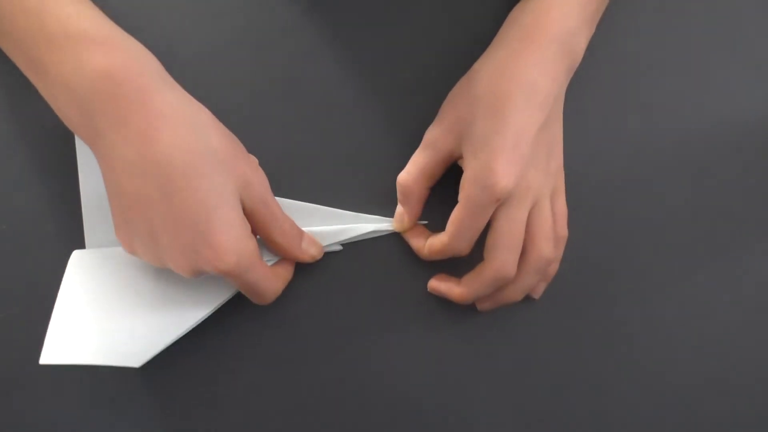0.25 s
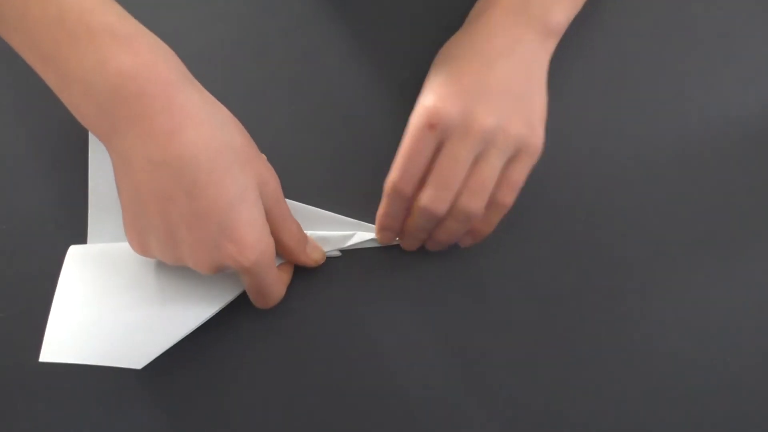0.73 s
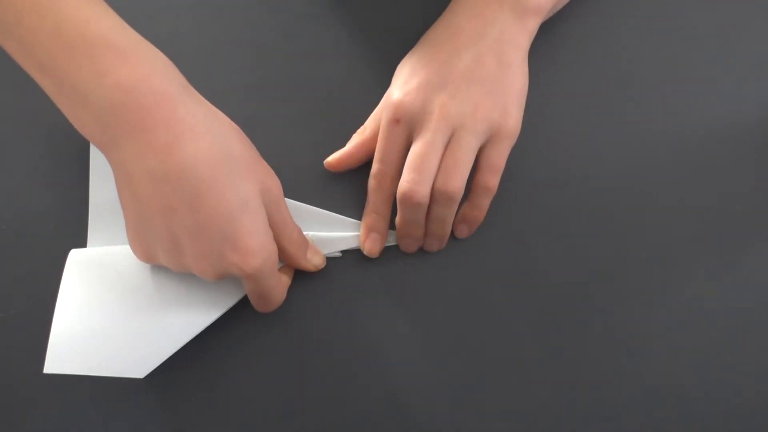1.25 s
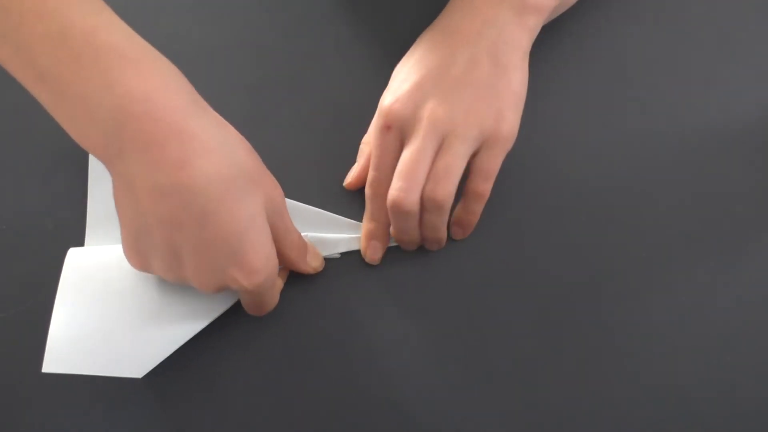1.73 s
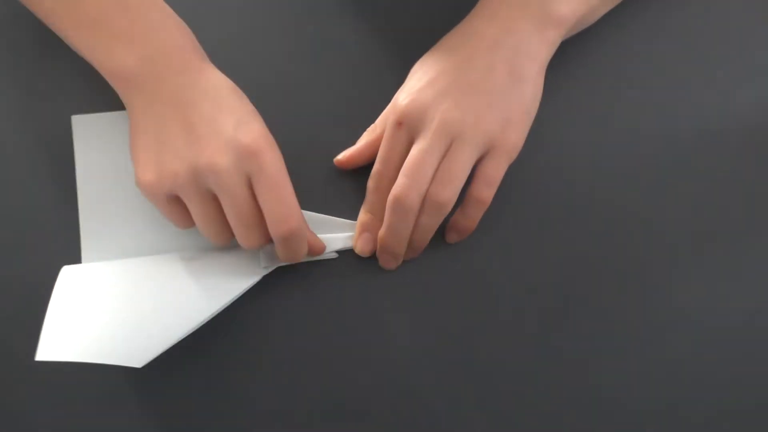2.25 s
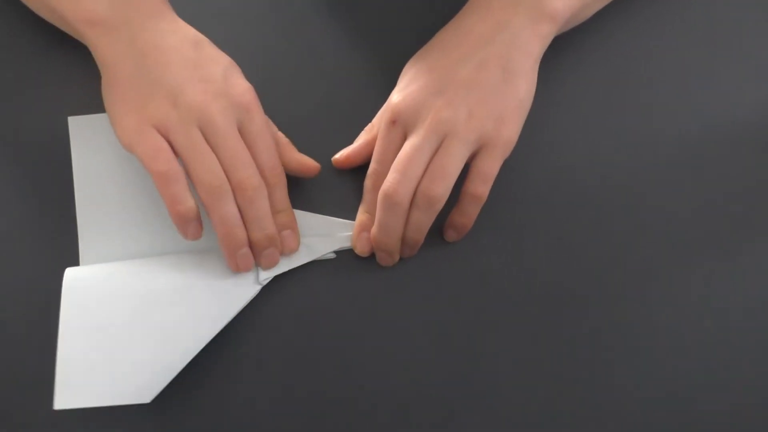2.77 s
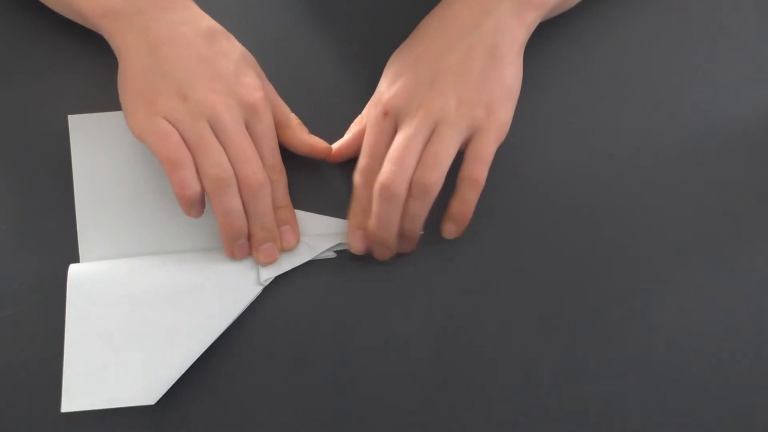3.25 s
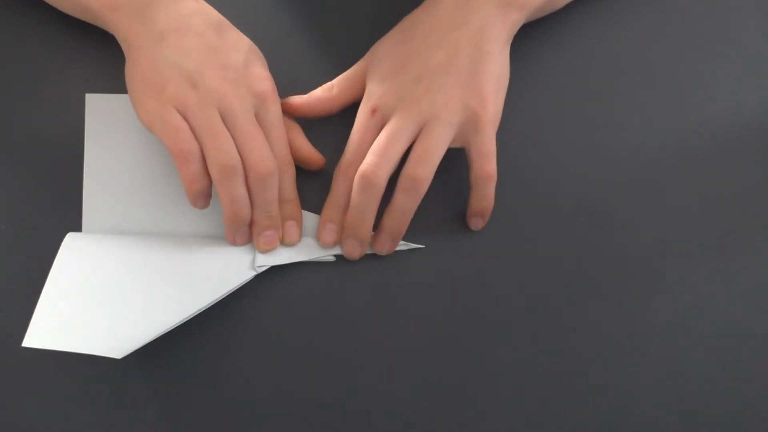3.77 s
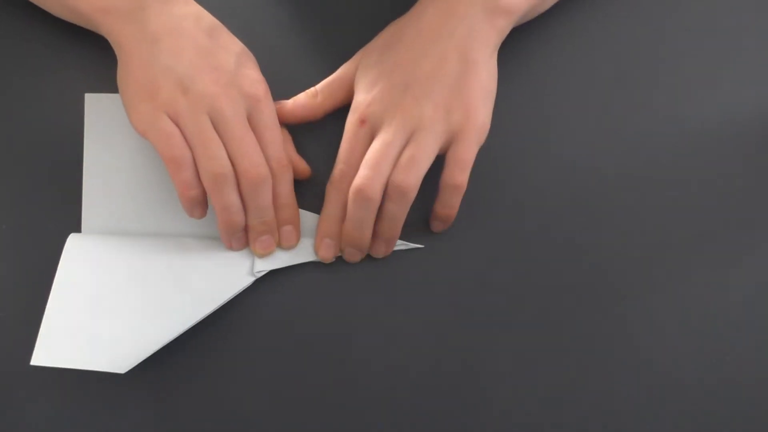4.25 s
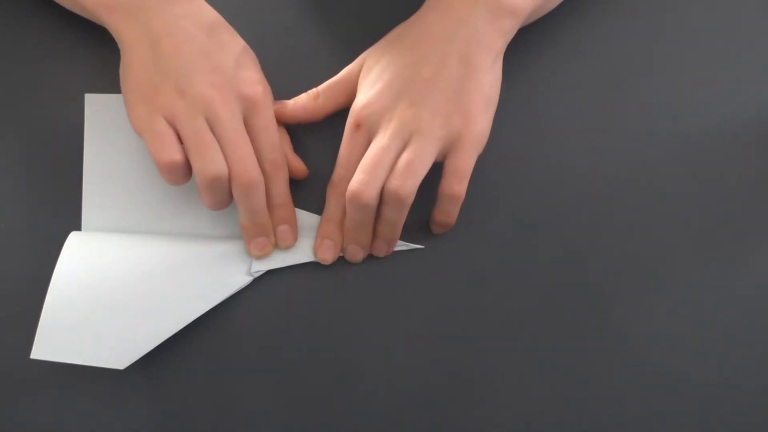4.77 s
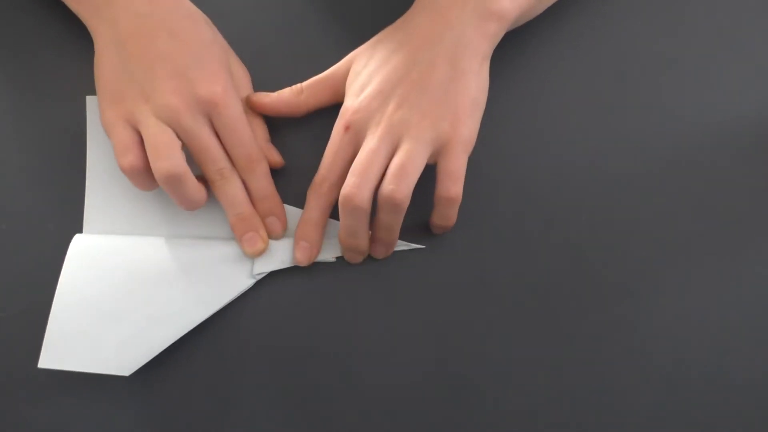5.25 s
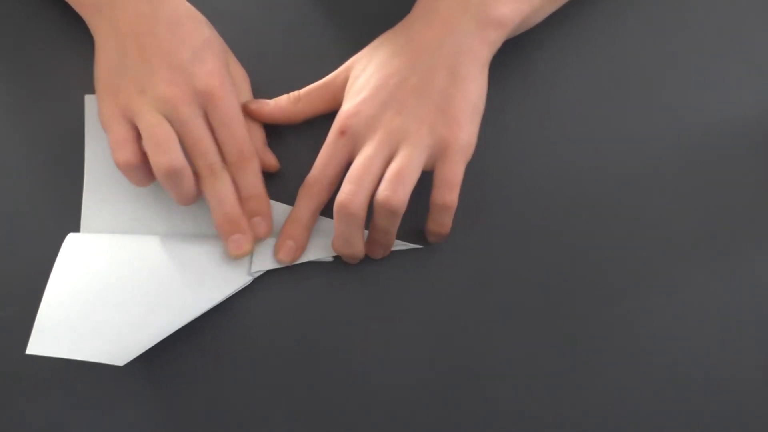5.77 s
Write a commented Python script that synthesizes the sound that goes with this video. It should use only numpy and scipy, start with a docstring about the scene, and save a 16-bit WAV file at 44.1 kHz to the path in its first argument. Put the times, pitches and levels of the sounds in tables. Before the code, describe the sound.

Hands press folds into a stiff sheet of paper on a table. Crisp snaps come at once, then a dense run of crackles before two seconds. It thins to ticks, dull paper slaps and short rustles, then isolated loud pops with a soft table boom, ending on a hard snap. Close stereo microphone, paper slightly left, small quiet room with faint hiss, rumble and a thin whine.

```python
"""Folding paper on a table

Creases snap as bursts of breaks through sheet resonances, single fibres tick, a loose wing slaps in dull notes.
Fingers slide over the sheet as grainy noise, and hands boom the table top through a few low decaying modes.
A quiet room answers with sparse reflections over rumble, hiss and a thin whine, close to a small stereo mic.
A limiter ducks for loud snaps and creeps back up."""
import sys
import numpy as np
from scipy import signal
from scipy.fft import rfft, irfft
from scipy.io import wavfile
from scipy.ndimage import uniform_filter1d

SR = 44100
rng = np.random.default_rng(int(sys.argv[2]) if len(sys.argv) > 2 else 0)


def wav_out(sig):
    """Save sig, one row per channel (or a flat mono array), as 16-bit PCM at SR to the path in sys.argv[1]."""
    wavfile.write(sys.argv[1], SR, np.round(np.clip(np.atleast_2d(sig).T, -1, 1) * 32767).astype(np.int16))


def volts_from_decibels(level):
    """Turn decibel levels (scalar or array-like) into linear amplitude factors."""
    exponent = np.asarray(level, float) / 20
    return 10 ** exponent


N = 265261  # length in samples


def read(points, hz):
    """Value of a (Hz, value) table, straight on a log axis."""
    f, value = np.transpose(points)
    return np.interp(np.log(hz + 1), np.log(f + 1), value)


def evened(x):
    """Scales to rms 1."""
    return x / np.sqrt(np.mean(x ** 2) + 1e-20)


def peaked(x):
    """Scales each row to peak 1."""
    return x / abs(x).max(1, keepdims=True)


def smooth_noise(shape, width):
    """Slow random wander of rms 1: white noise averaged over width samples."""
    return evened(uniform_filter1d(rng.standard_normal(shape), width))


def coloured(x, gain):
    """Multiplies the spectrum of x by gain(Hz)."""
    return irfft(rfft(x) * gain(np.fft.rfftfreq(x.shape[-1], 1 / SR)), x.shape[-1])


def place(times, sounds):
    """Mixes each sound in at its time."""
    mix = np.zeros(N + sounds.shape[1])
    for s, sound in zip(times, sounds):
        mix[round(s * SR):][:len(sound)] += sound
    return mix[:N]


def modes(table, hz, shift):
    """Spectrum of a row of resonances with alternating signs, all moved by the factor shift."""
    total = 0
    for k, (f, width, db) in enumerate(table):
        total = total + (-1) ** k * volts_from_decibels(db) * width / (width + 2j * (hz - f * shift))
    return total


# Colour of the room tone. Each row: frequency in Hz, relative density in dB per Hz.
ROOM_TONE = [(22, -18), (86, -17.5), (123, -2), (146, -11.5), (210, -11), (410, -16), (558, -24.5),
             (2080, -19), (2670, -24), (3530, -28), (9400, -34.5), (14500, -37.5), (16200, -49)]
# How alike left and right are, in room tone and reverb. Each row: frequency in Hz, likeness (1 = identical).
STEREO_LIKENESS = [(30, 0.12), (70, 0.76), (180, 0.38), (550, 0.14), (1650, 0.32), (5000, 0.97), (15000, 1)]


def hush():
    """Room rumble and microphone hiss: shaped stereo noise, wavering a little in patches."""
    level_db, waver_db = -44.5, 2.37  # both rms
    frames, hz = N // 512 + 5, np.fft.rfftfreq(2048, 1 / SR)
    a, b, c, d, patches = rng.standard_normal((frames, 1025, 5)).T
    patches = evened(uniform_filter1d(uniform_filter1d(patches, 20, 0), 10, 1))
    same = np.clip(read(STEREO_LIKENESS, hz), -1, 1)[:, None]
    left = a + 1j * b
    right = same * left + np.sqrt(1 - same ** 2) * (c + 1j * d)
    z = np.array([left, right]) * volts_from_decibels(read(ROOM_TONE, hz)[:, None] + waver_db * patches)
    noise = signal.istft(z, nperseg=2048, noverlap=1536)[1][:, :N]
    return volts_from_decibels(level_db) * evened(noise)


def whine():
    """A faint thin sine that drifts by a few hertz."""
    centre_hz, level_db = 2700, -60  # level is rms
    drift_hz = 2.37 * smooth_noise(N, 9000)
    turns = np.cumsum(centre_hz + drift_hz) / SR
    return volts_from_decibels(level_db) * np.sqrt(2) * np.sin(2 * np.pi * turns)


# How fast the room dies away. Each row: frequency in Hz, time to fall 60 dB in seconds.
ROOM_DECAY = [(150, 0.47), (800, 0.4), (2100, 0.21), (5500, 0.48), (14000, 0.088)]


def room(x):
    """Sparse reflections of random sign, each band dying at its own speed."""
    taps = np.zeros((2, SR // 2))
    # one reflection in every 20 samples, after a short gap
    at = np.arange(200, SR // 2 - 20, 20) + rng.integers(0, 20, (2, (SR // 2 - 201) // 20))
    np.put_along_axis(taps, at, rng.choice([-1., 1.], at.shape), 1)
    hz, t, z = signal.stft(taps, SR, nperseg=256)
    same = np.clip(read(STEREO_LIKENESS, hz), 0, 1)[:, None]  # close ports hear much the same tail
    z[1] = same * z[0] + np.sqrt(1 - same ** 2) * z[1]
    fade = volts_from_decibels(-60 * t / read(ROOM_DECAY, hz)[:, None])
    tail = signal.istft(z * fade, SR, nperseg=256)[1]
    tail = tail / np.linalg.norm(tail, axis=1, keepdims=True)
    return signal.fftconvolve(x[None], tail, axes=1)[:, :N]


# Hands leaning on the table top; the row at 1.661 s is the top booming after a snap. Each row: start in
# seconds, # length of the push in seconds (as it feeds the lowest mode), peak level in dB.
HAND_BUMPS = [(0.595, 0.13, -31.5), (0.868, 0.015, -39.5), (1.0, 0.096, -37), (1.329, 0.065, -36),
              (1.661, 0.025, -36), (2.261, 0.021, -34.5), (2.99, 0.023, -34), (3.898, 0.036, -37),
              (4.293, 0.08, -21.5), (4.39, 0.045, -33.5), (5.291, 0.12, -34), (5.799, 0.064, -33.5)]
# Low modes of the table top. Each row: frequency in Hz, relative level in dB,
# time for the boom to fall 60 dB in seconds.
TABLE_MODES = [(118, 1, 0.14), (134.3, -8, 0.19), (182, -11.5, 0.36), (220, -4, 0.17), (294.6, -7.5, 0.12),
               (444.5, -11, 0.091)]


def bumps(size=16384):
    """Low modes of the table top shudder while a hand settles, then die; knocking creases thump it too."""
    s, length, level_db = np.transpose(HAND_BUMPS)[:, :, None]
    t, boom, thump = np.arange(size) / SR, 0, 0
    lowest_hz = TABLE_MODES[0][0]
    for f, db, t60 in TABLE_MODES:
        shudder = uniform_filter1d(rng.standard_normal((len(s), size)), 500)
        shudder = evened(uniform_filter1d(shudder, 500))
        turns = rng.random((len(s), 1)) + np.cumsum(f * (1 + 0.055 * shudder), axis=1) / SR
        kept = length * lowest_hz / f  # higher modes are fed for a shorter time
        boom_db = db + 2.2 * shudder[:, ::-1] - 60 * np.maximum(t - kept, 0) / t60
        boom = boom + volts_from_decibels(boom_db) * np.sin(2 * np.pi * turns)
        # the thump is steady in pitch, dies sooner and favours the higher modes
        thump = thump + f / lowest_hz * volts_from_decibels(db - 60 * t / (0.83 * t60)) * np.sin(2 * np.pi * f * t)
    snap_s, peak_db, _, _, knock_db = np.transpose(CREASE_SNAPS)[:, :, None]
    snap_thumps = volts_from_decibels(peak_db + knock_db - 24) * thump * np.minimum(t / 0.0033, 1)
    hand = boom * np.minimum(t / 0.0096, 1) + 0.5 * thump * np.minimum(t / 0.0024, 1)
    return place(s[:, 0], volts_from_decibels(level_db) * peaked(hand)) + place(snap_s[:, 0], snap_thumps)


# The loose wing slapping the table top. Each row: start in seconds, peak level in dB, note in Hz.
WING_FLAPS = [(0.7089, -23, 1160), (1.0942, -30, 1010), (1.2063, -30, 1120), (1.3327, -16.5, 940),
              (2.4355, -27, 990), (2.5456, -27, 1390), (2.5632, -24, 1410), (2.993, -17, 1380)]


def flaps(size=2048):
    """A soft, uneven contact of a few milliseconds rings one broad, dull note of the wing."""
    s, peak_db, note_hz = np.transpose(WING_FLAPS)[:, :, None]
    t, hz = np.arange(size) / SR, np.fft.rfftfreq(size, 1 / SR)
    contact = 0.16 * rng.standard_normal((len(s), size)) * volts_from_decibels(-60 * t / 0.029)
    contact[:, 0] += 1
    lowcut = (1j * hz / (note_hz + 1j * hz)) ** 4  # little below the note
    resonance = 1 / (1 + 2j * (hz - note_hz) / 260)
    dulling = 1 / (1 + 1j * hz / 4000)  # a dull tick above it
    ring = irfft(rfft(contact) * lowcut * resonance * dulling, size)
    return place(s[:, 0], volts_from_decibels(peak_db) * peaked(ring))


# Single fibres letting go. Each row: start in seconds, peak level in dB, pitch in Hz.
FIBRE_TICKS = [(.184, -37, 3170), (.9883, -25, 2800), (1.409, -32, 4300), (1.4723, -21.5, 2930),
               (1.536, -23, 4800), (1.563, -19, 4200), (1.844, -29, 5000), (1.918, -26, 2370),
               (2.09, -25, 2870), (2.1683, -18, 2370), (2.612, -24, 2600), (3.0025, -30, 4800),
               (3.127, -35, 3140), (3.302, -29, 3800), (3.379, -35, 2370), (3.4075, -28, 2130),
               (3.442, -36.5, 4500), (3.5292, -23, 2200), (3.5454, -25, 2560), (3.599, -26.5, 2700),
               (3.8687, -37, 3000), (3.8906, -31, 1470), (3.8981, -31, 2900), (3.917, -29, 2500),
               (4.0092, -32.5, 1770), (4.0915, -31.5, 2420), (4.2208, -34.5, 1580), (4.2952, -24, 3020),
               (4.305, -22.5, 2820), (4.376, -32, 2100), (4.4606, -24.5, 2120), (4.96, -25.5, 1310),
               (5.111, -32, 3036), (5.143, -33, 2900), (5.166, -31, 2970), (5.306, -29.5, 2700),
               (5.316, -33, 4400), (5.39, -29, 2610), (5.443, -29.5, 2400), (5.481, -24.5, 2200),
               (5.6677, -23, 2780), (5.7678, -29.5, 4500), (5.7825, -22, 2980), (5.798, -28, 2600)]


def ticks(size=1024):
    """A tiny burst of breaks rings one broad patch of the sheet for a few milliseconds."""
    s, peak_db, note_hz = np.transpose(FIBRE_TICKS)[:, :, None]
    t, hz = np.arange(size) / SR, np.fft.rfftfreq(size, 1 / SR) + 1
    breaks = rng.standard_normal((len(s), size)) * np.minimum(t / 0.00049, 1) * volts_from_decibels(-60 * t / 0.015)
    patch = 1 / (1 + 1.5j * (hz / note_hz - note_hz / hz)) ** 2
    return place(s[:, 0], volts_from_decibels(peak_db) * peaked(irfft(rfft(breaks) * patch, size)))


def grains(per_s, uneven_db):
    """Random slips of skin over paper fibres, uneven in size."""
    size = volts_from_decibels(uneven_db * np.minimum(rng.exponential(1, N), 4))
    return size * rng.standard_normal(N) * (rng.random(N) < per_s / SR)


def patchy(x, patchy_db):
    """Pitch regions a few hundred hertz wide swell and fade as the sheet bends."""
    z = signal.stft(x, nperseg=256)[2]
    patches = uniform_filter1d(rng.standard_normal(z.shape[::-1]).T, size=4, axis=0)
    patches = uniform_filter1d(patches, size=8, axis=1)
    return evened(signal.istft(z * volts_from_decibels(patchy_db * evened(patches)), nperseg=256)[1][:N])


# Fingers swishing over the sheet. Each row: start in seconds, rise in seconds, hold in seconds,
# fizz of the skin in dB, rustle of the sheet in dB (both before the pressure eases).
FINGER_STROKES = [(0.486, 0.0083, 0.03, -69, -43), (0.583, 0.0019, 0.037, -37, -27.5),
                  (0.843, 0.0024, 0.03, -49, -41), (1.354, 0.0031, 0.042, -53, -45),
                  (1.935, 0.006, 0.032, -39.5, -33), (2.14, 0.023, 0.02, -47, -49),
                  (2.22, 0.045, 0.05, -41, -36.5), (2.374, 0.04, 0.03, -43, -34),
                  (2.463, 0.02, 0.045, -50, -41.5), (2.522, 0.033, 0.066, -46, -43.5),
                  (3.605, 0.0053, 0.015, -27.5, -31.5), (4.271, 0.0081, 0.06, -58, -41),
                  (4.649, 0.002, 0.022, -34, -35), (5.019, .0033, 0.012, -44.5, -61),
                  (5.329, 0.016, 0.032, -46.5, -41.5), (5.63, 0.0032, 0.017, -49.5, -31.5),
                  (5.763, .0087, 0.21, -52.5, -47.5)]
# Level curve of the ticking sheet under restless hands. Each row: time in seconds, rms level in dB.
FIDGET_LEVEL = [(0, -58), (2.0, -49.5), (2.6, -58.5), (3.15, -57), (3.3, -52), (3.5, -61.5), (5.2, -53),
                (5.33, -50.5), (5.5, -52), (6.01, -53)]
# Colour of the fine skin noise. Each row: frequency in Hz, relative level in dB per Hz.
FIZZ_COLOUR = [(2500, -29.5), (4000, -5.5), (6500, -8), (9000, -5), (12000, -8.5), (15000, -18),
               (16200, -53)]
# Colour of the coarser sheet noise. Each row: frequency in Hz, relative level in dB per Hz.
RUSTLE_COLOUR = [(300, -13.5), (650, -16), (1200, -1.5), (1700, -5.5), (2600, -4), (3700, -5),
                 (6000, -17.5), (9000, -18)]


def slide():
    """Dense fine slips fizz and coarser ones rustle during strokes; tiny creases tick throughout."""
    lift_db_per_s = -420  # fade once the finger lifts
    t, fizz_gain, rustle_gain = np.arange(N) / SR, 0, 0
    for s, rise, hold, fizz_db, rustle_db in FINGER_STROKES:
        easing_db = -5 * np.clip((t - s) / (rise + hold), 0, 1)  # pressure eases along the stroke
        lift_db = lift_db_per_s * np.maximum(t - s - rise - hold, 0)
        onset = np.sin(np.pi / 2 * np.clip((t - s) / rise, 0, 1)) ** 2
        shape = onset * volts_from_decibels(easing_db + lift_db)
        fizz_gain = fizz_gain + volts_from_decibels(fizz_db) * shape
        rustle_gain = rustle_gain + volts_from_decibels(rustle_db) * shape

    def creak_colour(hz):
        return modes(SHEET_MODES, hz, 0.913) * volts_from_decibels(read(RUSTLE_COLOUR, hz))

    fizz = evened(coloured(grains(per_s=24000, uneven_db=-1.0), lambda hz: volts_from_decibels(read(FIZZ_COLOUR, hz))))
    rustle = evened(coloured(grains(per_s=8000, uneven_db=1.7), lambda hz: volts_from_decibels(read(RUSTLE_COLOUR, hz))))
    creaks = evened(coloured(grains(per_s=400, uneven_db=3.0), creak_colour))
    fidget = creaks * volts_from_decibels(np.interp(t, *np.transpose(FIDGET_LEVEL)))
    uneven = volts_from_decibels(1.5 * smooth_noise(N, 200))  # the strokes flutter by 1.5 dB rms
    strokes = patchy(fizz, 2.0) * fizz_gain + patchy(rustle, 2.0) * rustle_gain
    return strokes * uneven + fidget


# Buckling creases. Each row: start in seconds, peak level in dB, pitch of the buckled patch in Hz,
# treble crack in dB and low knock in dB, both against the body.
CREASE_SNAPS = [(0.0196, -23, 1310, -5, 3.5), (0.0506, -7, 1900, -17, -22), (0.2905, -17.5, 1920, -25, -16),
                (0.3197, -22.5, 1690, -25, -12), (0.3452, -15, 1860, -23, -11.5),
                (0.3901, -14.5, 2000, -16.5, -10), (0.4452, -18.5, 1300, -40, -10.5),
                (0.5041, -24.5, 2530, -23, -6.5), (0.688, -10, 2690, -37, -15), (0.742, -17, 2060, -18, -6),
                (0.8469, -23.5, 3570, 2, -15), (0.869, -15.5, 2650, -35, -8.5),
                (0.9918, -9.5, 2280, -16.5, -15.5), (1.3312, -15, 3200, -11, -5),
                (1.3667, -23.5, 3220, -2, 7), (1.3713, -10, 3000, -15.5, -9.5),
                (1.526, -1.5, 4020, -16, -18.5), (1.5476, -12.5, 2020, -14, -16),
                (1.571, -7, 1360, -17, -7.5), (1.5987, -7.5, 1440, -16.5, -6),
                (1.653, -8, 1560, -15.5, -5.5), (1.679, -12.5, 1370, -18, -4),
                (1.7, -11.5, 1790, -23.5, -7), (1.7231, -11, 1320, -18, -4.5),
                (1.8065, -4.5, 3330, -16.5, -15), (1.8599, -14, 3100, -3, -7), (1.879, -18.5, 3320, -6, -2),
                (1.9253, -8.5, 1680, -23, -15), (1.945, -16, 2300, -11.5, -17),
                (2.4989, -18.5, 2920, -21, -16), (2.9927, -14.5, 3980, -18, -32),
                (3.2467, -27.5, 3060, -9, -14), (3.3111, -18, 3140, -6, -14),
                (4.2731, -11.5, 2770, -16, -18.5), (4.3153, -23, 3220, -9.5, -6),
                (4.3325, -22.5, 3220, -10, -9.5), (4.4861, -23.5, 2690, -15, -7),
                (4.6425, -5.5, 6100, 4.5, -13.5), (4.6543, -1.5, 1220, -47, -12.5),
                (4.9228, -18, 2620, -6, -13), (4.9386, -10, 1900, -27, -10.5), (5.355, -20, 2430, -8, -12),
                (5.6276, -4.5, 3000, -10, -12), (5.6385, -15.5, 2690, -25, -4.5),
                (6.013, 2.5, 1384, -49, -14.5)]
# Resonances of the sheet that colour every snap. Each row: frequency in Hz, width in Hz, level in dB.
SHEET_MODES = [(1525, 530, 0.5), (2296, 396, 8), (2695, 263, 8.5), (3247, 345, 5), (3652, 247, 4.5),
               (4950, 1500, -1.5)]
# The sheet knocking on the table. Each row: frequency in Hz, width in Hz, level in dB.
KNOCK_MODES = [(780, 590, -9.5), (990, 174, 2.5), (1370, 177, 0)]


def snaps(size=2048):
    """A cluster of fibre breaks rings the sheet; bending waves carry the treble ahead of the bass."""
    s, peak_db, centre_hz, crack_db, knock_db = np.transpose(CREASE_SNAPS)[:, :, None]
    t, hz = np.arange(size) / SR, np.fft.rfftfreq(size, 1 / SR) + 1
    draw = rng.standard_normal((len(s), 2, size))
    shift = 1 + 0.0358 * draw[:, 0, -1:]  # each bend retunes the sheet a little
    breaks = 0.4 * draw[:, 0] * (abs(draw[:, 1]) > 1.2) * volts_from_decibels(-60 * t / 0.016)
    breaks += 0.2 * draw[:, 0] * (abs(draw[:, 1]) > 2.8) * volts_from_decibels(-60 * t / 0.11)  # stray fibres follow
    breaks[:, 0] += 1.5  # the crease gives way at once
    spread = np.exp(-2j * np.pi * 0.045 * (np.sqrt(hz) - hz / 230))  # delay falls as 1 / sqrt(Hz)
    waves = rfft(breaks) * spread

    hump = 1 / (1 + 0.52j * (hz / centre_hz - centre_hz / hz)) ** 2  # size of the buckled patch
    body = peaked(irfft(waves * modes(SHEET_MODES, hz, shift) * hump, size))

    lowcut = (1j * hz / 550 / (1 + 1j * hz / 550)) ** 2
    dulling = 1 / (1 + 1j * hz / 1800)
    knock = peaked(irfft(waves * modes(KNOCK_MODES, hz, shift) * lowcut * dulling, size))

    # a few milliseconds of fine tearing
    tearing = draw[:, 1] * np.minimum(t / 0.0013, 1) * volts_from_decibels(-60 * t / 0.014)
    treble = 1 / (1 + 0.9j * (hz / 8000 - 8000 / hz)) ** 2
    crack = peaked(irfft(rfft(tearing) * treble, size))

    snap = peaked(body + volts_from_decibels(crack_db) * crack + volts_from_decibels(knock_db) * knock)
    return place(s[:, 0], volts_from_decibels(peak_db) * snap)


# Paper lies to the left. Each row: frequency in Hz, left over right in dB.
LEFT_OVER_RIGHT = [(100, .5), (400, 1), (800, 3.5), (2000, 2.3), (5000, .8), (15000, .7)]


def scene():
    """Paper left of centre in the room, table boom in the middle."""
    paper = snaps() + ticks() + flaps() + slide()
    side = np.array([[0.5], [-0.5]])
    # the working spot on the sheet shifts left and right: 3.5 dB rms, smoothed over 0.02 s
    wander_db = 3.5 * smooth_noise(N, round(0.02 * SR))
    body = coloured(paper, lambda hz: 1 / (1 + (hz / 8000) ** 2))
    treble = paper - body  # stays put
    moving = treble + body * volts_from_decibels(side * wander_db)
    direct = coloured(moving, lambda hz: volts_from_decibels(side * read(LEFT_OVER_RIGHT, hz)))
    return direct + bumps() + volts_from_decibels(-11.0) * room(body) + hush() + whine()


def band_limit(x):
    """A steep low-pass at the top of the band."""
    return signal.sosfilt(signal.butter(12, 15500, fs=SR, output="sos"), x)


def record(dry):
    """A limiter that looks 25 ms ahead holds peaks of the left-right mean near a ceiling, recovering slowly."""
    ceiling_db, regain_db_per_s = -8.1, 0.71
    ahead = round(0.025 * SR)
    over_db = 20 * np.log10(abs(dry.mean(0)) + 1e-9) - ceiling_db
    soon_db = np.concatenate([over_db[ahead:], np.full(ahead, -99.)])
    regained_db = np.arange(N) * regain_db_per_s / SR
    cut_db = np.maximum(np.maximum.accumulate(soon_db + regained_db) - regained_db, 0)
    mix = dry / volts_from_decibels(uniform_filter1d(cut_db, 100))
    return band_limit(mix)


dry = scene()
out = record(dry)
wav_out(out)
```